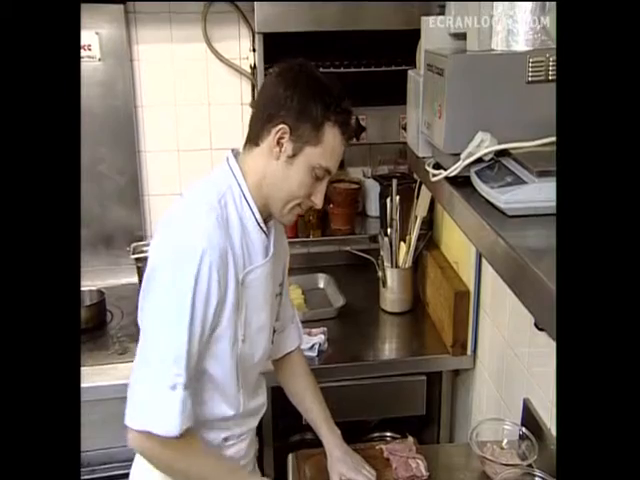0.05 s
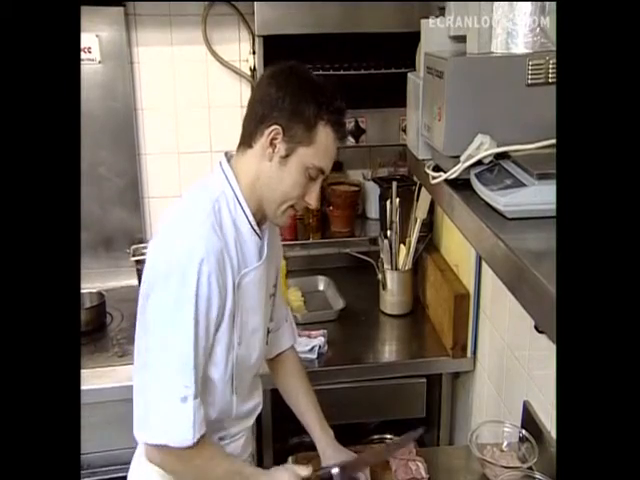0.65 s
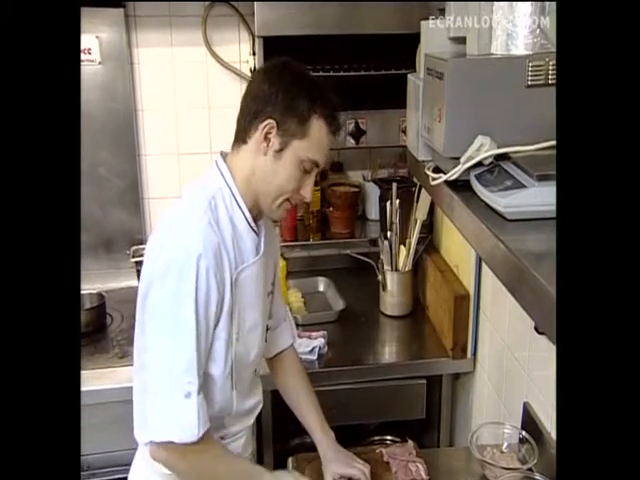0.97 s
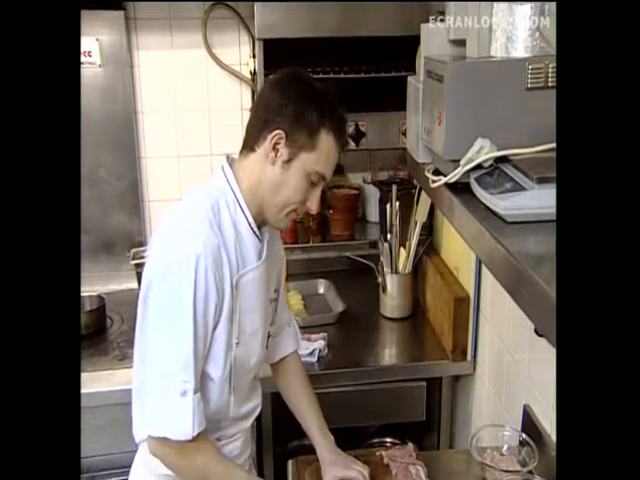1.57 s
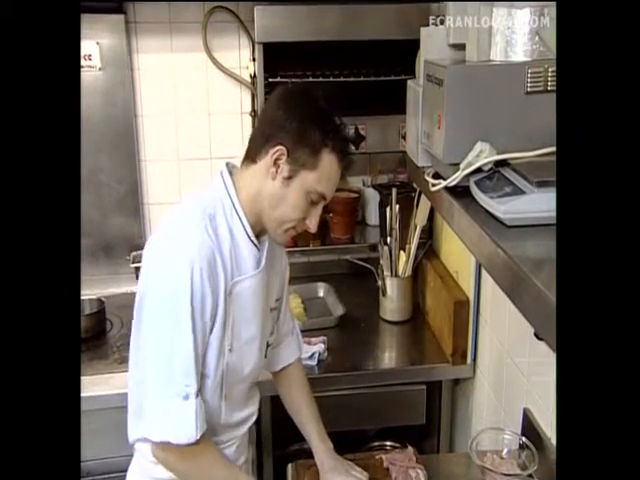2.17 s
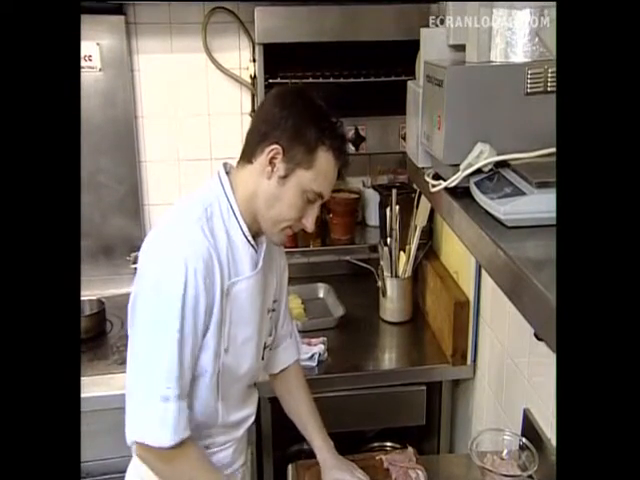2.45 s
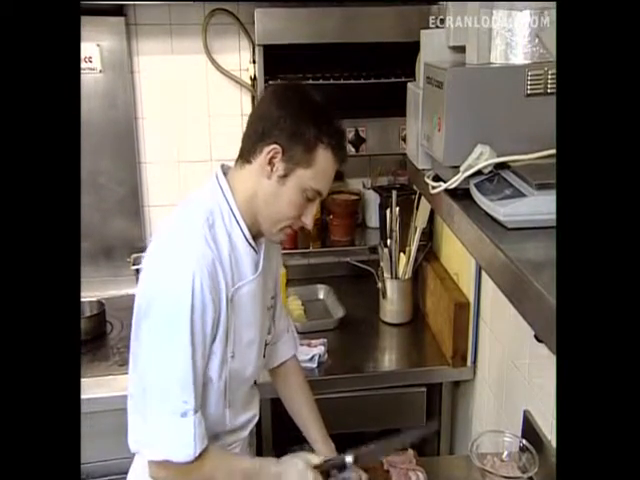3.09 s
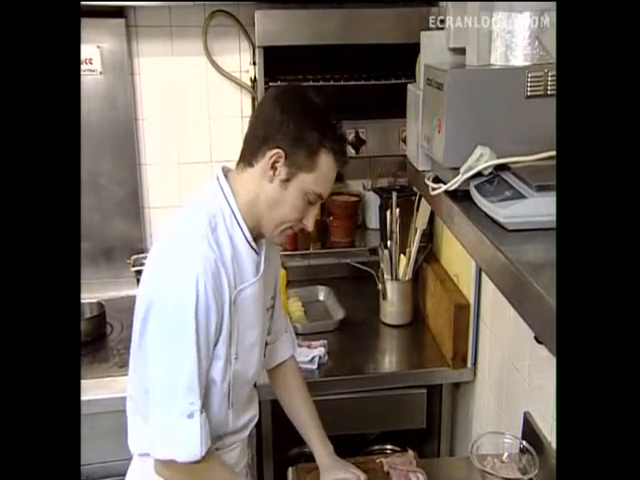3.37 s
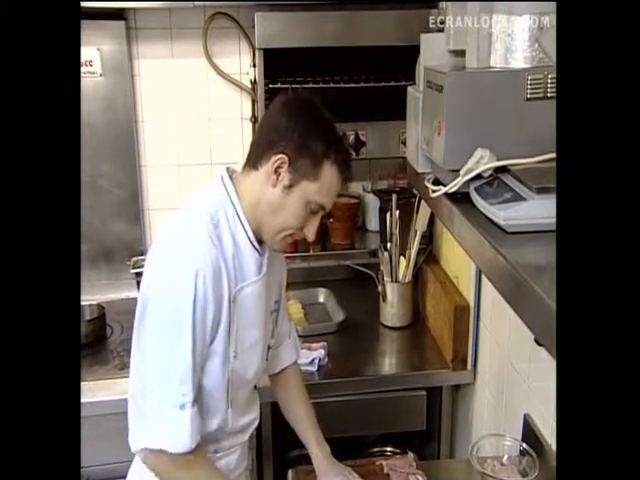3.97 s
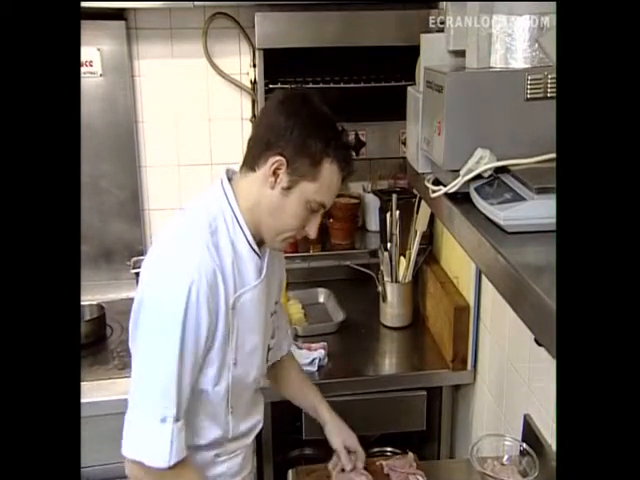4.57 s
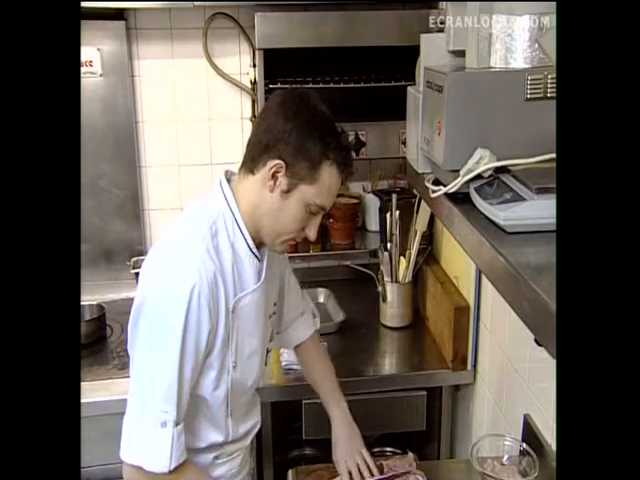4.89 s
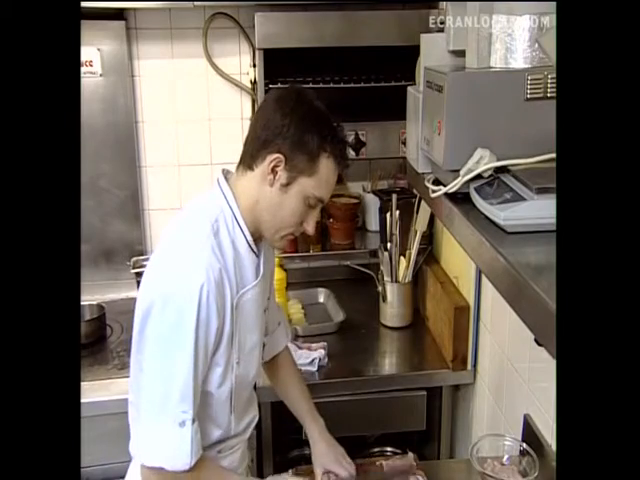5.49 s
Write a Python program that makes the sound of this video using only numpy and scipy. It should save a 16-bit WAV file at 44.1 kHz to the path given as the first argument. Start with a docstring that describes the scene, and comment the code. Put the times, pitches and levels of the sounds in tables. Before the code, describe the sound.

A large knife lands lightly on meat and bone on a wooden board, then chops hard. Bone cracks, and the board and steel counter ring briefly. The blade saws and scrapes with small snaps before a second hard chop, followed by a sharp snap, more scraping and dull knocks. Refrigeration and a fan hum steadily in the tiled kitchen, heard from beside the counter.

```python
"""A knife chops meat on the bone on a wooden board, on a steel counter in a tiled restaurant kitchen.
The cook sets the blade with a light blow and chops hard twice: bone cracks, and board, blade and
counter ring on in the room. Around the blows he saws and scrapes, fibres catching on the edge, while
bits of bone snap and the board knocks and bumps. Refrigeration hums and a fan rushes underneath."""
import sys
import numpy as np
from scipy import signal
from scipy.fft import rfft, irfft, next_fast_len
from scipy.io import wavfile

SR = 44100
rng = np.random.default_rng(int(sys.argv[2]) if len(sys.argv) > 2 else 0)


def store_wav(level_fs):
    """Save 16-bit WAV to argv[1]."""
    pcm = np.round(np.clip(np.atleast_2d(level_fs), -1, 1) * 32767)
    wavfile.write(sys.argv[1], SR, pcm.T.astype(np.int16))


N = 244128
TIME = np.arange(N) / SR
AGE = TIME[:int(.8 * SR)]   # seconds since a hit

# resonances of the knife blade: f/Hz, width/Hz, lift/dB
BLADE_PEAKS = [(1764, 140, 6.5), (2775, 220, 4.5), (3270, 330, 1), (3564, 200, 5), (4520, 120, 2.5),
               (5510, 330, 4), (6480, 160, 5), (7000, 200, 1), (7660, 120, 6), (8170, 150, 5.5),
               (9400, 220, 1), (12500, 400, -4)]


def chops():
    """The blade cracks through bone into the board; board, steel and counter ring on in the room."""
    # blows: t/s, crack/dB, board/dB, struck spot's resonance/Hz, low-mid lift/dB, steel/dB,
    # tilt/(dB per octave), thud/dB, thud t60/s, sustain/s
    blows = [(0.7453, -29.5, -38, 763, 11, -47, 2, -20, 0.6, 0.012),
             (1.2851, -14.5, -21, 748, 0, -31.5, 1.8, -13, 0.66, 0.12),
             (3.315, -11, -28, 1120, -9, -27, -0.5, -17.5, 0.6, 0.083)]
    # contacts within a blow, bone first and then board: delay/s, level/dB, t60/s
    contacts = [(0, -6, 0.016), (.0028, 1, 0.03)]
    # lasting modes of the board: f/Hz, level/dB, t60/s
    board_modes = [(200, 0.5, 0.91), (332.2, 1.5, 0.66), (387, -4, 0.54), (485, 1, 0.57), (578, -7.5, 0.74),
                   (696, -7, 0.53), (835, -16, 0.51), (1095, -8, 0.28), (1194, -17, 0.95)]
    # close, beating modes of the counter: f/Hz, level/dB
    counter_modes = [(86, -5.5), (107, 0), (119, 3.5), (131, -14.5)]
    # spectra of the crack, the wood and the steel: f/Hz, level/dB
    crack_eq = [(150, -13), (600, -0.5), (1500, 0.5), (2800, 4), (5000, -3.5), (7500, -1.5), (10000, -14),
                (16000, -21.5)]
    wood_eq = [(70, -2.5), (160, 5), (240, -0.5), (350, 4.5), (500, 2), (750, 2), (1100, -0.5), (1500, -6),
               (2500, -11), (5000, -35)]
    steel_eq = [(400, 10), (1200, -6), (2000, -3.5), (3000, 1.5), (4200, 1.5), (6000, -1.5), (8000, -5),
                (10500, -11.5), (16000, -24)]
    drop_eq = [(120, -37), (230, -8), (340, -7), (450, 2.5), (800, -16), (3000, -52)]
    out = np.zeros(N)
    for s, crack_db, board_db, spot_hz, low_db, steel_db, tilt_db, thud_db, thud_t60, sustain in blows:
        for delay, db, t60 in contacts:
            add(out, s + delay, amp(crack_db + db) * splinter(crack_eq, tilt_db, t60))
        # the spot where the blade lands favours one resonance of the board
        low_mids = (260, 170, low_db)
        knock = noise(wood_eq, peaks=[(spot_hz, 90, 6), low_mids]) * fade(t60=0.093)
        wood_tail = reverberate(noise(wood_eq, peaks=[(spot_hz, 200, 4), low_mids]), sustain)
        wood = amp(1) * wood_tail + amp(-10) * ring(board_modes, sustain, scatter_db=2.5)
        steel = reverberate(noise(steel_eq, tilt_db=tilt_db, peaks=BLADE_PEAKS), sustain * 1.03)
        # the heavy counter takes longer to get swinging under a long blow
        counter = ring([(hz, db, thud_t60) for hz, db in counter_modes], sustain * 0.18)
        thud = counter * attack(sustain * 0.57) + amp(-6) * knock + amp(-13) * tock(spot_hz, t60=0.19)
        body = amp(board_db) * wood + amp(steel_db) * steel + amp(thud_db) * thud
        add(out, s + contacts[-1][0], body)
        # the board jumps and drops back onto the counter
        drop = noise(drop_eq, peaks=[low_mids]) * fade(t60=0.064) * attack(0.0032)
        add(out, s + sustain * .95, amp(board_db + 8.5) * drop)
    return out


def splinter(spectrum, tilt_db, t60):
    """One hard pressure spike in a short burst of fracture noise."""
    burst = rng.standard_normal(len(AGE)) * fade(t60)
    energy = np.sum(burst ** 2)
    burst[round(.0005 * SR)] += np.sqrt(energy) * .6
    return colour(burst, spectrum, tilt_db) * np.sqrt(energy / len(AGE)) * fade(t60=.3)


def ring(modes, sustain, scatter_db=0):
    """Struck modes die away; scatter varies their balance from blow to blow."""
    return sum(amp(db + scatter_db * rng.standard_normal())
               * np.sin(2 * np.pi * hz * AGE) * held(t60, sustain) for hz, db, t60 in modes)


def tock(hz, t60):
    """One short clear resonance of the wood."""
    return np.sin(2 * np.pi * hz * AGE) * fade(t60)


def snaps():
    """Bone snaps sharply and sets the blade ringing, with a tail from the tiles."""
    # bone snaps and blade clicks: t/s, level/dB, tilt/(dB per octave), room tail/dB
    cues = [(0.281, -43.5, 2, -16.5), (0.401, -50.5, 0, -7), (0.5402, -42, -8, -18), (0.952, -44, -14, -17),
            (1.0762, -40.5, -10, -30), (1.1925, -34, -0.5, -26), (1.5768, -26, -1, -24.5),
            (1.662, -33.5, 3, -17), (2.1538, -26.5, -3.5, -22), (2.349, -22.5, 0, -23),
            (2.879, -38.5, -15, -19.5), (3.7011, -13.5, 5, -20.5)]
    # spectrum of a snap: f/Hz, level/dB
    snap_eq = [(300, -34), (1300, -10), (2100, 7.5), (3000, 4.5), (5500, 5.5), (8000, 2), (10500, -4),
               (16000, -5.5)]
    out = np.zeros(N)
    for s, db, tilt_db, room_db in cues + ticks():
        crack = amp(3) * splinter(snap_eq, tilt_db, t60=0.0048)
        blade = amp(-14.5) * noise(snap_eq, tilt_db=tilt_db, peaks=BLADE_PEAKS) * fade(t60=0.14)
        tail = reverberate(noise(snap_eq, tilt_db=tilt_db, peaks=BLADE_PEAKS), sustain=0.022)
        add(out, s, amp(db) * (crack + blade + amp(room_db) * tail))
    return out


def ticks(per_s=2.5, room_db=-27):
    """Extra snap cues: gristle and blade tick faintly, by chance, as the joint is handled."""
    wait, loud, bright = rng.uniform(-1, 1, (60, 3)).T
    times = np.cumsum(1 + .8 * wait) / per_s
    cues = zip(times, -51 + 3 * loud, 6 * bright)
    return [(s, db, tilt_db, room_db) for s, db, tilt_db in cues if s < TIME[-1]]


def strokes():
    """The blade hisses through the meat, crisper where it bites, and rasps lower on the wood."""
    # strokes: t/s, length/s, fastest point/share of length, hiss/dB, treble lift/dB, rasp/dB
    cues = [(0, 0.14, 0.49, -49, -2, -55), (1.665, 0.12, .5, -51.5, 4, -62),
            (1.74, 0.11, .28, -43.5, 7.5, -54), (1.889, 0.23, 0.51, -44, 3, -49),
            (2.281, .11, 1, -39, 2.5, -51.5), (2.453, 0.12, 0.72, -40.5, 2.5, -51.5),
            (2.659, 0.12, 0.82, -46, 0.5, -53.5), (3.651, 0.045, 0.87, -41, -11, -50),
            (3.713, 0.14, 0.47, -45.5, 3, -59), (3.89, 0.1, 0.21, -45.5, 0.5, -49.5),
            (3.983, 0.16, 0.73, -45.5, -2.5, -40.5), (4.187, 0.15, 0.57, -47, -2.5, -41),
            (4.38, 0.12, 0.77, -60, 3, -65), (5.043, 0.039, .5, -60, 12.5, -50.5)]
    # spectra of slicing meat and scraping wood: f/Hz, level/dB
    slice_eq = [(300, -14), (1200, -2), (1900, 4.5), (3500, 2), (5000, 2.5), (8200, -2), (11000, -6),
                (16000, -12)]
    scrape_eq = [(150, -3.5), (450, 4), (780, 7), (1300, -5.5), (1550, -11.5), (3500, -16), (7000, -22),
                 (12000, -63)]
    # resonances of the blade pressed against the board: f/Hz, width/Hz, lift/dB
    rasp_peaks = [(815, 130, 3), (1105, 93, 9), (1316, 75, 13.5), (1610, 110, 7.5), (1960, 230, 13.5),
                  (2930, 380, 10.5), (3720, 200, 14), (5700, 160, 10), (6500, 330, 16)]
    hiss = friction(slice_eq, BLADE_PEAKS, grain_db=2.5)
    treble = signal.sosfiltfilt(signal.butter(2, 7000, "high", fs=SR, output="sos"), hiss)
    rasp = friction(scrape_eq, rasp_peaks, grain_db=3.5)
    out = np.zeros(N)
    for start, length, fastest, hiss_db, crisp_db, rasp_db in cues:
        effort = push(start, length, fastest)
        out += effort * (amp(hiss_db) * (hiss - treble) + amp(rasp_db) * rasp)
        out += effort ** 1.46 * amp(hiss_db + crisp_db) * treble   # the treble swells more steeply
    return out


def friction(spectrum, peaks, grain_db, tears_per_s=130):
    """Fibres catch and let go: uneven grains and tiny tears excite the resonances."""
    tears = (rng.random(N) < tears_per_s / SR) * rng.standard_normal(N) * amp(14)
    grains = rng.standard_normal(N) * amp(grain_db * drift(330))
    rub = colour(grains + tears, spectrum, peaks=peaks)
    # reflections from the counter and walls shift as the blade moves, so the rub shimmers
    delays = rng.uniform(.002, .014, 4)
    reflections = sum(np.interp(TIME - delay - 1e-4 * drift(6), TIME, rub) for delay in delays)
    return rms_one(rub + .25 * reflections)


def push(start, length, fastest, bite_s=.016, swell_db=6, t60=0.45):
    """Envelope of one stroke: a quick bite, a rise and fall of blade speed, then the room's decay."""
    age = np.maximum(TIME - start, 0)
    speed = np.sin(np.interp(age / length, [0, np.clip(fastest, .05, .95), 1], [0, np.pi / 2, np.pi]))
    dying_db = -60 * np.maximum(age - length, 0) / t60
    return np.minimum(age / bite_s, 1) * amp(swell_db * (speed - 1) + dying_db)


def knocks():
    """Blade and meat land dully: a padded contact excites only a band of the board's resonances."""
    # knocks: t/s, level/dB, low edge/Hz, high edge/Hz, t60/s, room tail/dB, ring/Hz, ring/dB
    cues = [(3.647, -23, 790, 1060, 0.076, -12.5, 780, -1.5),
            (4.5956, -26, 450, 2110, 0.047, -15.5, 1986, -9.5)]
    # short hollow resonances of the board: f/Hz, width/Hz, lift/dB
    hollow_peaks = [(433, 270, 11.5), (522, 100, 8.5), (720, 120, 10.5), (810, 27, 4), (1090, 60, 1),
                    (1240, 45, 11), (1820, 190, 10.5)]
    out = np.zeros(N)
    soft_onset = 1 - np.exp(-(AGE / .001) ** 2)
    for s, db, low_hz, high_hz, t60, room_db, ring_hz, ring_db in cues:
        band = [(low_hz / 2, -12), (low_hz, 0), (high_hz, -3), (high_hz * 1.64, -24), (high_hz * 4, -48)]
        tail = amp(room_db) * reverberate(noise(band, peaks=hollow_peaks), sustain=0.0071)
        body = noise(band, peaks=hollow_peaks) * fade(t60)
        tone = amp(ring_db) * tock(ring_hz, t60=0.063)
        add(out, s, amp(db) * soft_onset * (body + tone + tail))
    return out


def nudges():
    """The hand presses the joint down and the board bumps softly on the counter."""
    # bumps: t/s, level/dB
    cues = [(0.298, -42), (1.962, -35), (2.059, -35.5), (2.709, -40), (4.1, -32.5)]
    out = np.zeros(N)
    for s, db in cues:
        bump = noise([(35, -30), (65, -1), (150, -2), (300, -18.5), (700, -35), (2000, -70)])
        add(out, s, amp(db) * bump * fade(t60=0.24, sustain=0.061) * attack(.008))
    return out


def reverberate(x, sustain):
    """A noise dies away between the tiles, each octave at its own rate."""
    # decay of the room: f/Hz, t60/s
    room_t60 = [(100, 1), (400, 0.52), (1000, 0.51), (3000, 0.48), (6000, 0.53), (10000, 0.22),
                (16000, 0.12)]
    spectrum, hz = rfft(x), np.fft.rfftfreq(len(x), 1 / SR)
    centres = np.geomspace(125, 16000, 8)
    out = 0
    for centre, share in zip(centres, np.eye(len(centres))):
        band = irfft(spectrum * at_hz(np.c_[centres, share], hz), len(x))
        out = out + band * held(at_hz(room_t60, centre), sustain)
    return out * attack(0.00055)


def machines():
    """The kitchen's bed: wavering compressor tones over duct rumble and fan rush."""
    # compressor tones: f/Hz, rms level/dB, waver/dB
    tones = [(99.2, -36.5, 0), (173.2, -48.5, 2.5), (198.7, -57, 2), (222.1, -57, 5), (305, -61, 4.5),
             (614, -61, 5), (937, -73, 9)]
    # spectra of the rumble and the fan: f/Hz, level/dB
    rumble_eq = [(15, -34), (34, 6.5), (50, -6.5), (75, 1), (130, 0), (200, -6), (280, -16), (450, -51)]
    fan_eq = [(120, -50), (280, 1.5), (500, -5.5), (900, -7.5), (1350, -16.5), (2400, -21), (4000, -24),
              (7000, -26.5), (10000, -32), (16000, -36.5)]
    # resonances of the extractor duct: f/Hz, width/Hz, lift/dB
    duct_peaks = [(591, 32, 6), (904, 53, 1.5), (1870, 360, 6.5), (2890, 150, 7), (3820, 230, 1.5)]
    hum = sum(amp(db + waver_db * drift(8.2)) * np.sqrt(2)
              * np.sin(2 * np.pi * (hz * TIME + rng.random())) for hz, db, waver_db in tones)
    rumble = amp(-42.5) * noise(rumble_eq, size=N)
    fan = amp(-50) * noise(fan_eq, size=N, peaks=duct_peaks)
    return hum + rumble + fan


def colour(x, spectrum, tilt_db=0, peaks=()):
    """EQ a signal: a spectrum, a tilt per octave above 1 kHz and resonant peaks; rms 1."""
    size = next_fast_len(len(x))
    hz = np.maximum(np.fft.rfftfreq(size, 1 / SR), 1)
    db = at_hz(spectrum, hz) + tilt_db * np.log2(np.maximum(hz, 1000))
    db = db + sum(lift / (1 + (2 * (hz - centre) / width) ** 2) for centre, width, lift in peaks)
    return rms_one(irfft(rfft(x, size) * amp(db), size)[:len(x)])


def noise(spectrum, size=len(AGE), tilt_db=0, peaks=()):
    """Coloured noise; rms 1."""
    return colour(rng.standard_normal(size), spectrum, tilt_db, peaks)


def drift(per_s):
    """Random wander with a spread of about 1."""
    return np.interp(TIME * per_s, np.arange(2000), rng.standard_normal(2000))


def attack(rise_s):
    """Envelope that eases up to full level."""
    return 1 - np.exp(-AGE / rise_s)


def fade(t60, sustain=0):
    """Exponential decay, its start rounded off by the sustain."""
    return amp(-60 * (np.hypot(AGE, sustain) - abs(sustain)) / t60)


def held(t60, sustain):
    """Envelope of a diffuse field: level while reflections build up, then a steady decay."""
    return amp(-60 * (np.cbrt(AGE ** 3 + abs(sustain) ** 3) - abs(sustain)) / t60)


def amp(db):
    """Decibels to gain."""
    return 10 ** (np.asarray(db) / 20)


def rms_one(x):
    """Scale to unit rms."""
    return x / np.sqrt(np.mean(x ** 2) + 1e-20)


def at_hz(points, hz):
    """Read a table on a log-frequency axis."""
    knots, values = np.transpose(points)
    return np.interp(np.log(np.maximum(hz, 1)), np.log(knots), values)


def add(track, s, sound):
    """Mix a sound into a track from time s."""
    start = round(s * SR)
    track[start:start + len(sound)] += sound[:N - start]


def scene():
    """The mono mix, heard from beside the counter."""
    return (machines() + chops() + knocks() + nudges() + strokes() + snaps())[None]


def record(dry):
    """Soft-clip the highest peaks and cut the extreme treble."""
    ceiling, cutoff_hz = .66, 15950
    lowpass = signal.ellip(10, .1, 80, cutoff_hz, fs=SR, output="sos")
    return signal.sosfilt(lowpass, ceiling * np.tanh(dry / ceiling))


dry = scene()
out = record(dry)
store_wav(out)
```